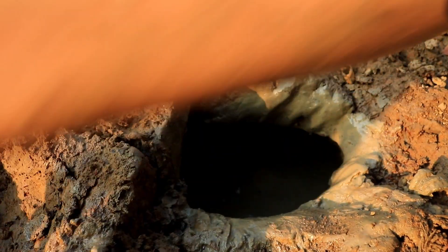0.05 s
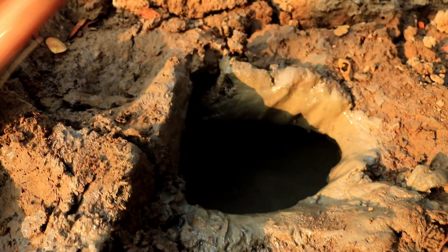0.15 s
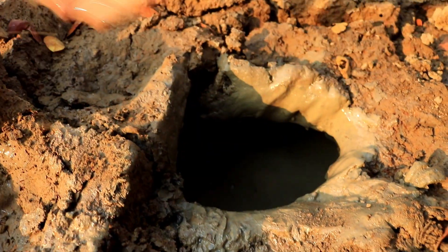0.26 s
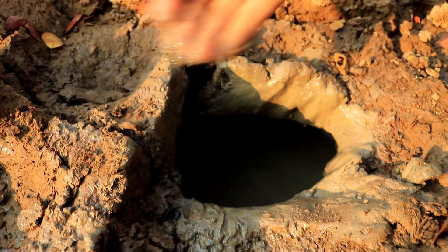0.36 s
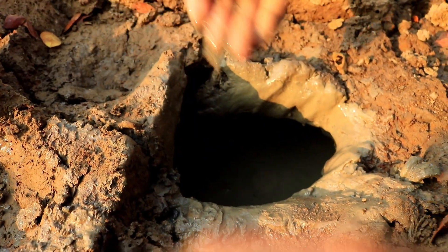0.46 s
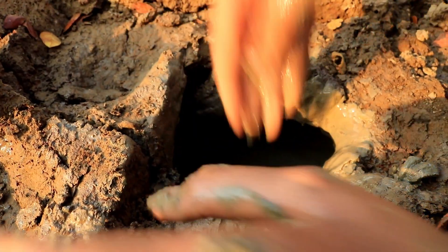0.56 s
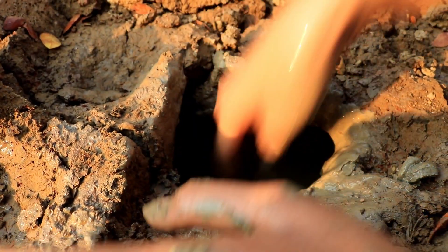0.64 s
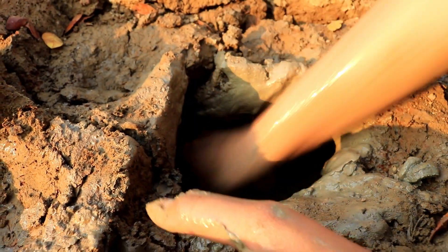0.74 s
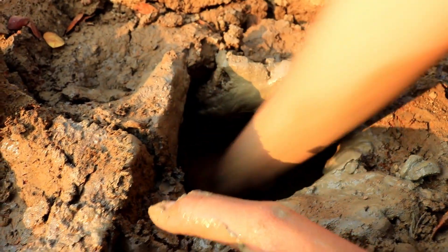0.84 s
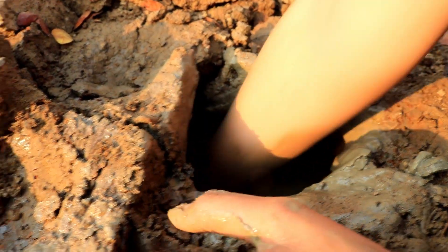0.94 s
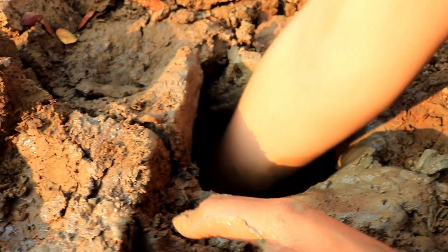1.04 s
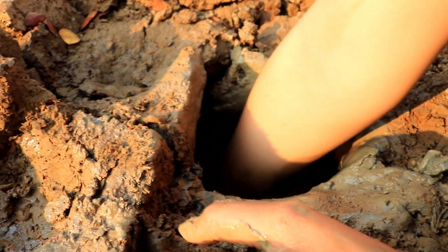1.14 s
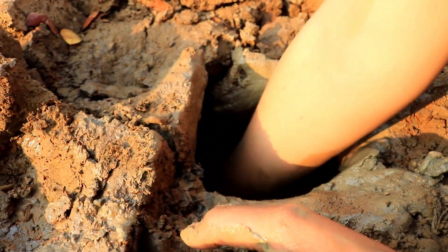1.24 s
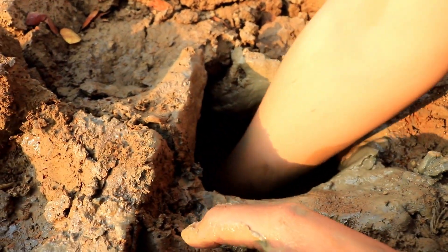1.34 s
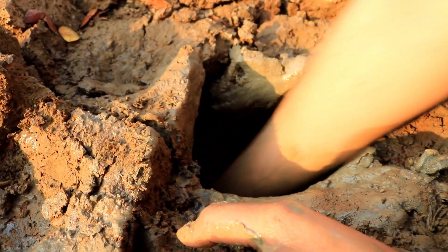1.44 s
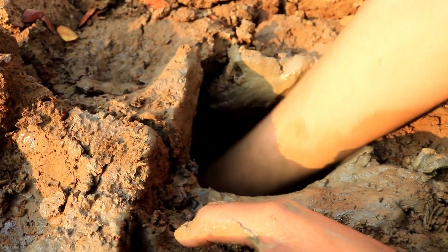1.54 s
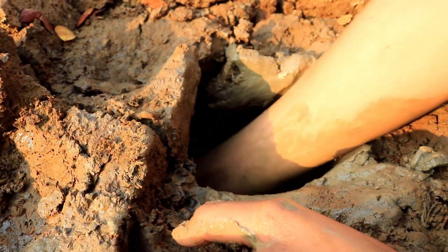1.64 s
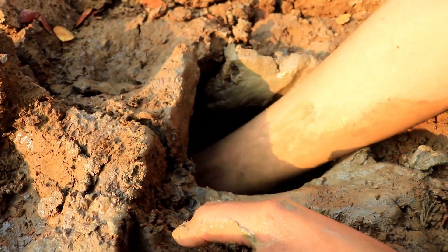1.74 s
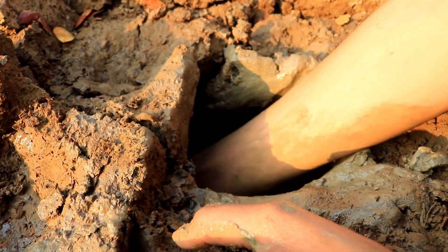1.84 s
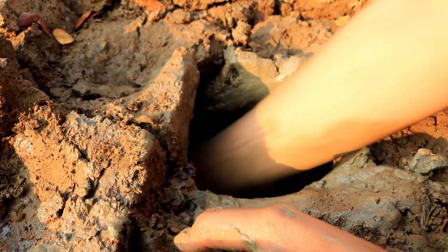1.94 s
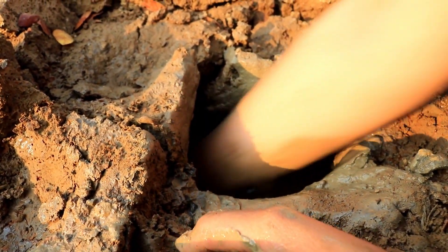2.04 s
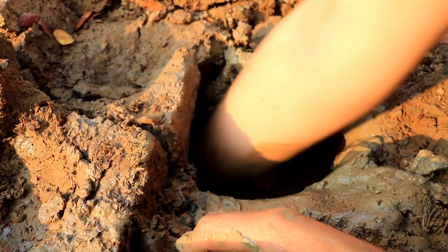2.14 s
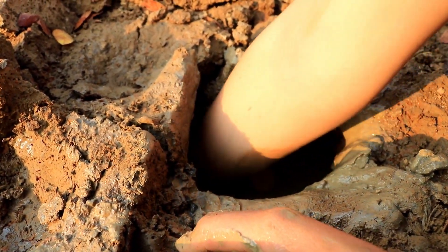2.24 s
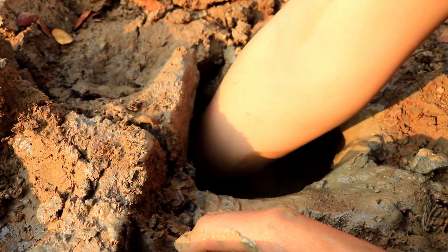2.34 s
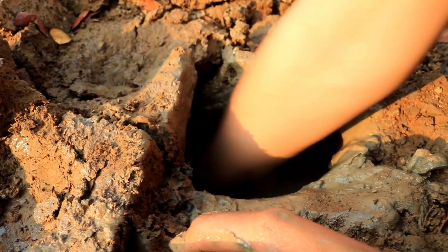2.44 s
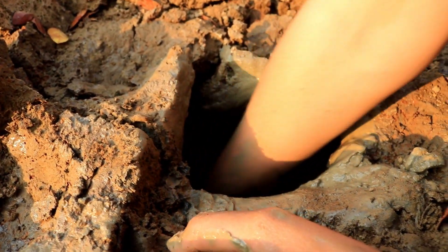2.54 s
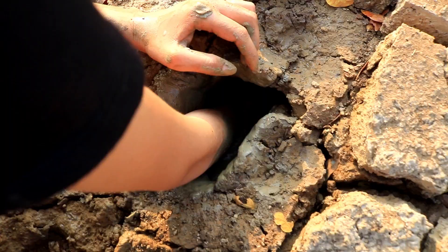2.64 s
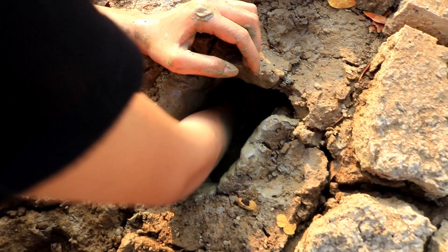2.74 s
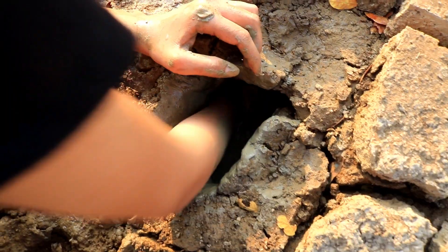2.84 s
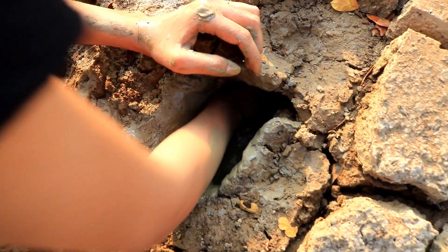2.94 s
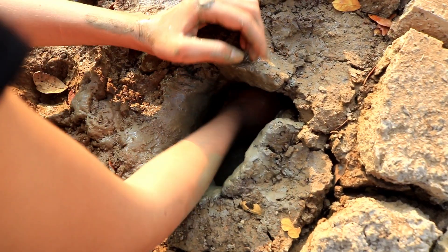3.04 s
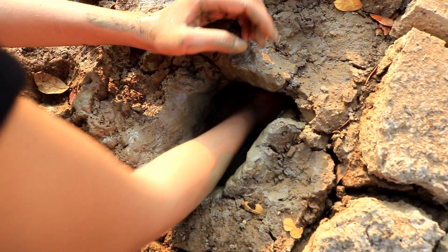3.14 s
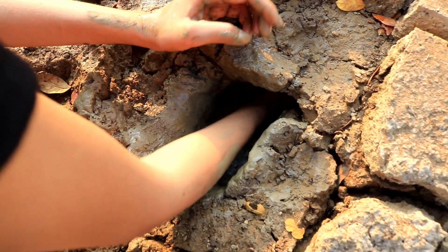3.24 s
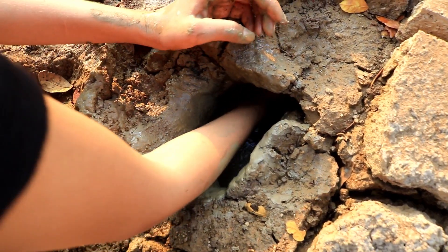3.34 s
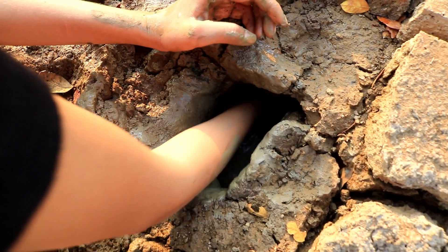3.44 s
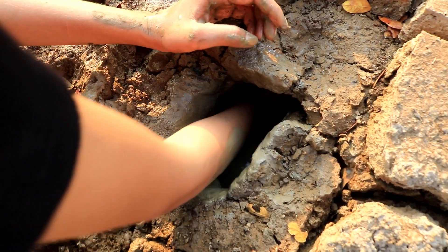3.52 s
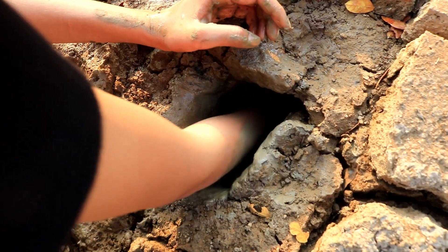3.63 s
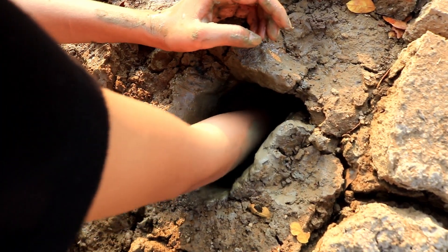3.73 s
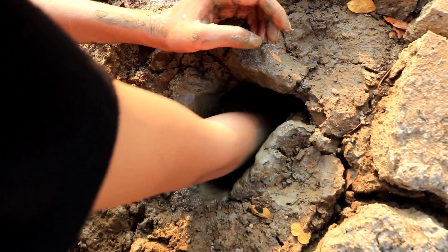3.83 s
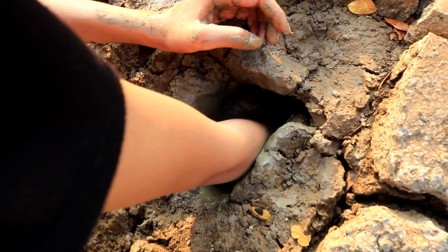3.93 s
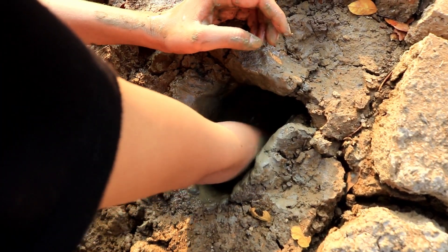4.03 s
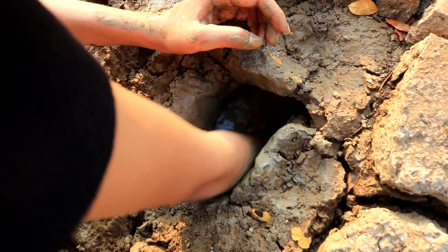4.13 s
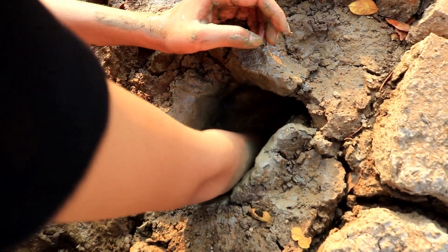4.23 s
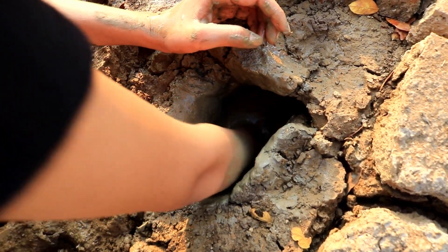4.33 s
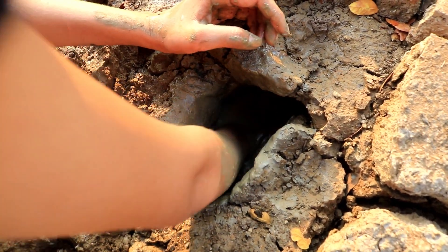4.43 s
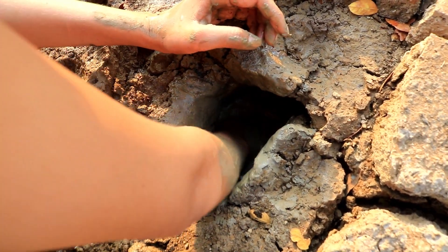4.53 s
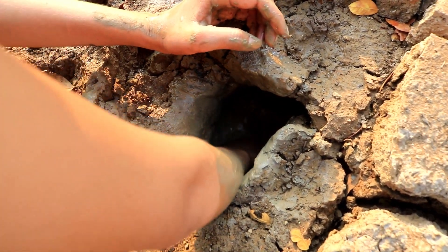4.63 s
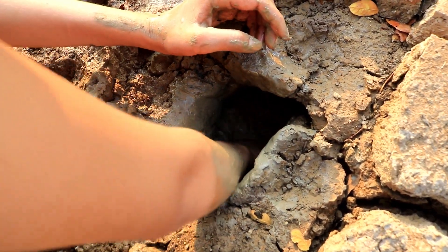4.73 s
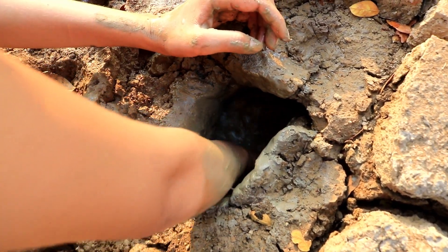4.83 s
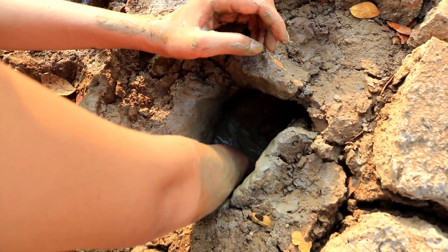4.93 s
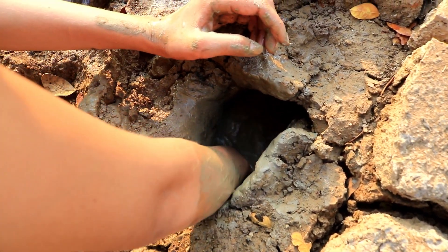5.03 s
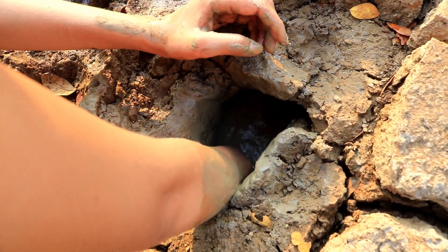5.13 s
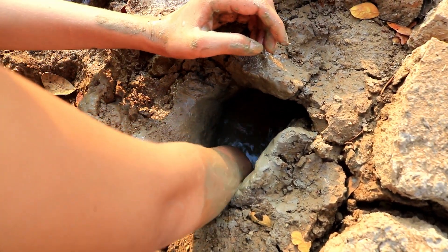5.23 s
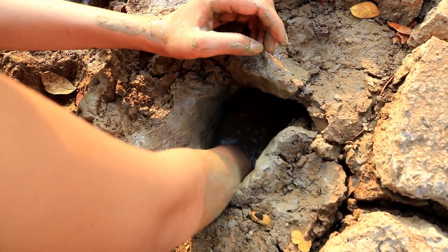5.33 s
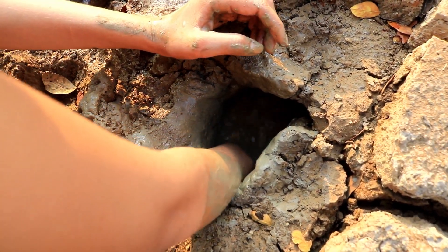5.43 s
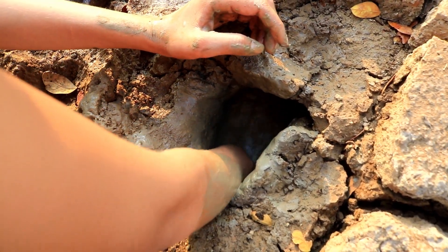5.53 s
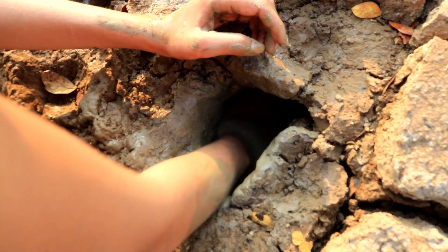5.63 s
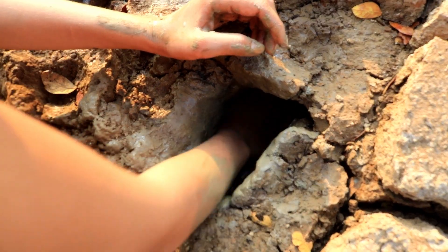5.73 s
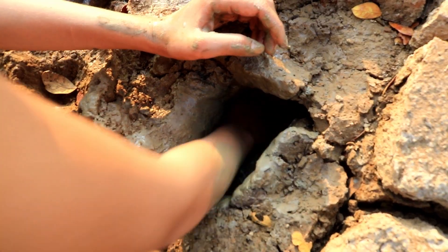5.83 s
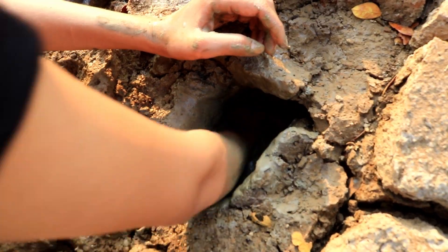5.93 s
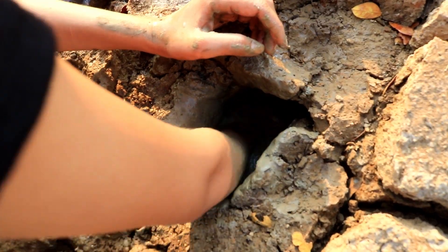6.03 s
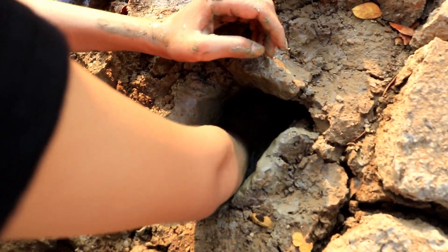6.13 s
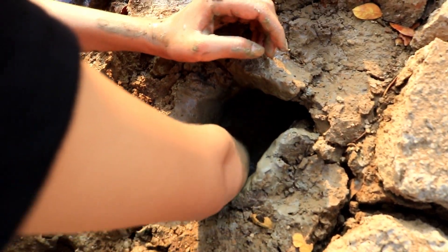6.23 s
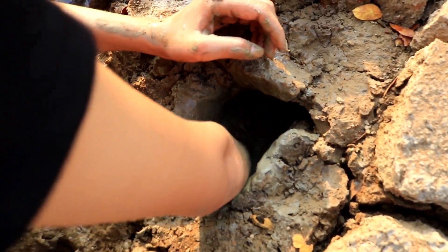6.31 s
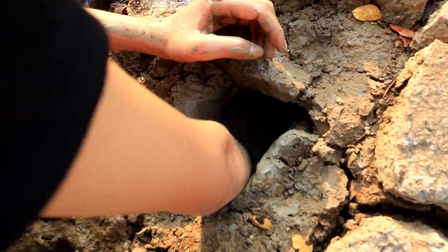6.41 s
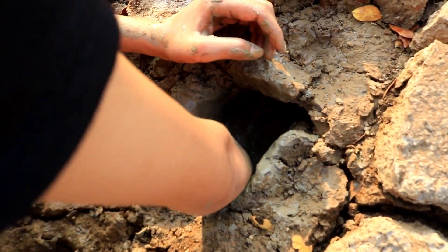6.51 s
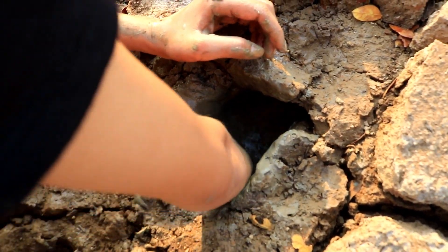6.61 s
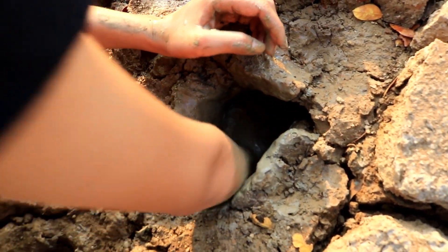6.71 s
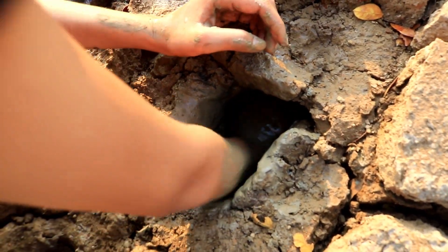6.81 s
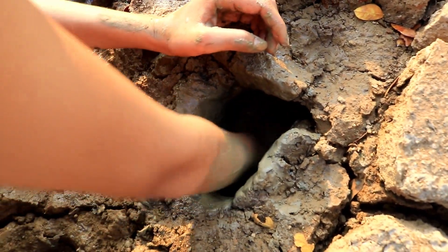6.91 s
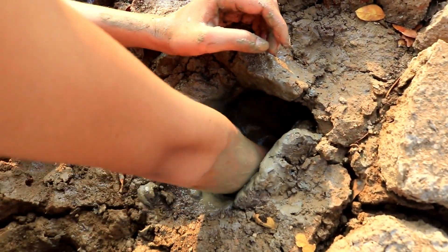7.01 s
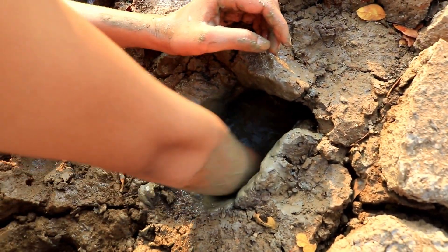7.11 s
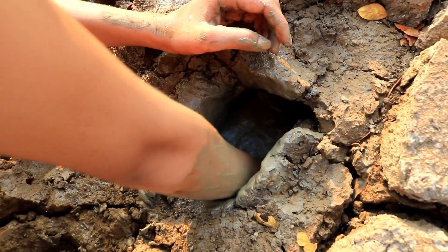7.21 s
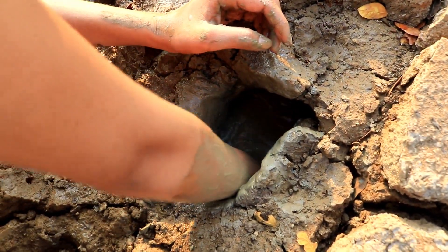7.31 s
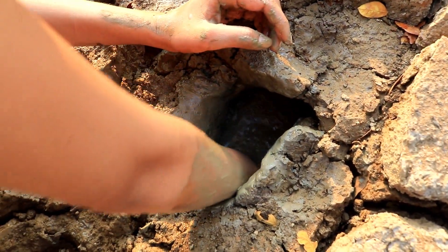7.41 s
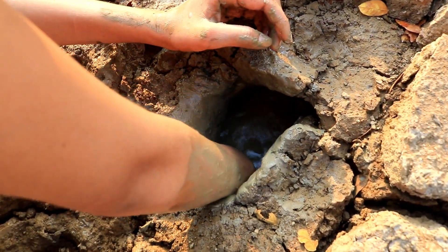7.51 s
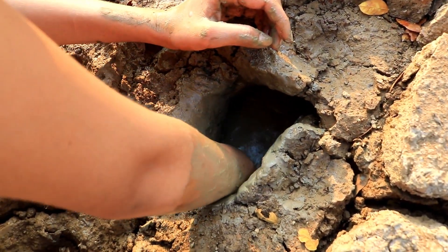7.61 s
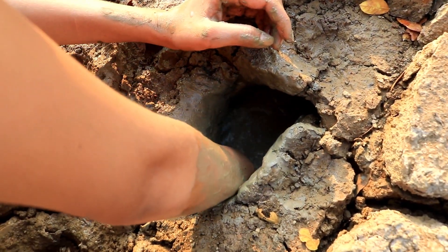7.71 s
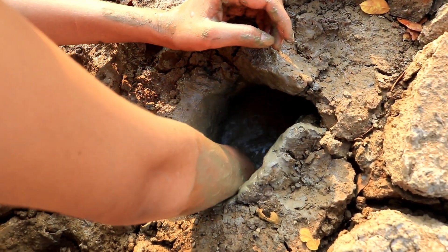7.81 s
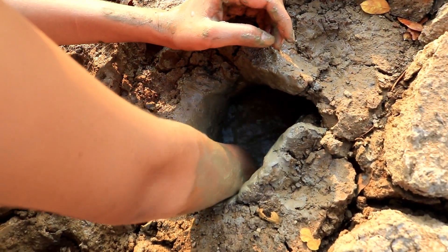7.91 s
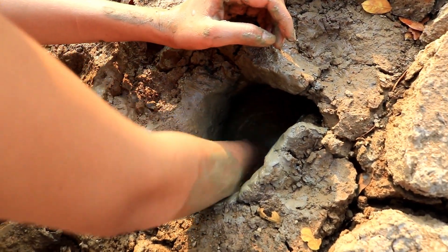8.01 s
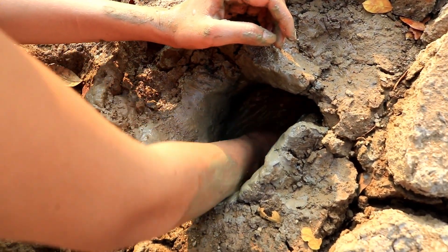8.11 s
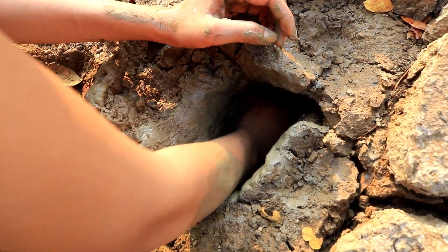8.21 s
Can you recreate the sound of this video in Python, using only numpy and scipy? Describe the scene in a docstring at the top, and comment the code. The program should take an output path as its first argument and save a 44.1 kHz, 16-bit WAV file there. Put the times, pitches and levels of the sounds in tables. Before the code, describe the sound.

Close irregular water slaps, gulping bubbles and fine spray from a hand stirring inside a muddy hole, low wind buffeting growing over the second half.

```python
"""A short fizz with a slap and plops opens over a faint open-air hush, then more slaps and plops
follow: an arm gropes in a narrow, water-filled hole in dry mud. Slaps are clusters of fading sine
tones with froth and spray of noise; plops are trapped bubbles, one fading sine each; droplets tick.
Gusts buffet both microphone ports: coloured noise shaken in lumps, with single thumps of pressure."""
import sys
import numpy as np
from scipy import signal
from scipy.fft import rfft, irfft, next_fast_len
from scipy.io import wavfile
from scipy.ndimage import uniform_filter1d, map_coordinates

SR = 44100
rng = np.random.default_rng(int(sys.argv[2]) if len(sys.argv) > 2 else 0)


def log_audio(samples):
    """Write samples as a 16-bit WAV file to the path given in sys.argv[1]."""
    # one column per channel
    frames = np.atleast_2d(samples).T
    # limit to full scale, then quantise
    limited = np.clip(frames, -1, 1)
    pcm = np.round(limited * 32767).astype(np.int16)
    wavfile.write(sys.argv[1], SR, pcm)


N = 364266  # length in samples
LEFT_RIGHT = np.array([[1], [-1]])  # splits a difference between the two ports


def amp(db):
    """Turn decibels into a gain."""
    return 10 ** (np.asarray(db) / 20)


def unit(x):
    """Scale to an average (rms) level of 1."""
    return x / np.sqrt(np.mean(x ** 2) + 1e-20)


def along(points, hz):
    """Read a curve of (Hz, value) points, with pitch on a log scale."""
    point_hz, value = np.transpose(points)
    return np.interp(np.log(hz + 1), np.log(point_hz + 1), value)


def curves(rows):
    """Give one value per sample for each column after the time."""
    s, *columns = np.transpose(rows)
    time = np.arange(N) / SR
    return [np.interp(time, s, column) for column in columns]


def wobble(rate):
    """A smooth random curve with this many random knots a second."""
    knots = rng.standard_normal(int(N * rate / SR) + 4)
    return map_coordinates(knots, [np.arange(N) * rate / SR])


def filtered(x, response):
    """Change the strength and phase of each frequency in x."""
    m = next_fast_len(N + 8192)
    return irfft(rfft(x, m) * response(np.fft.rfftfreq(m, 1 / SR)), m)[..., :N]


def rush(spectrum, alike, lumps):
    """Stereo noise of rms 1, shaken by the gain lumps before it is coloured."""
    # the angle sets how much the two sides share at each frequency
    angle = lambda hz: np.arccos(np.clip(along(alike, hz), -1, 1)) / 2
    shares = lambda hz: np.array([np.cos(angle(hz)), np.sin(angle(hz))])
    pair = lumps * rng.standard_normal((2, N))
    mid, side = filtered(pair, lambda hz: amp(along(spectrum, hz)) * shares(hz))
    return unit(np.array([mid + side, mid - side]))


def placed(s, wave, pan_db):
    """Add up rows of sound at their start times, each panned left or right."""
    start = np.round(s * SR).astype(int)
    at = (start[:, None] + np.arange(wave.shape[1])).ravel()
    panned = lambda side: (wave * amp(side * pan_db / 2)[:, None]).ravel()
    return np.array([np.bincount(at, panned(side), N + SR)[:N] for side in (1, -1)])


def bubbles(s, db, hz, t60, pan_db, rise, attack, rough):
    """Fading sines that start softly, climb a little in pitch and waver as the surface shakes."""
    t = np.arange(int(.1 * SR)) / SR  # each ring is cut off at 0.1 s
    fade = t / t60[:, None]  # t60: seconds to fall by 60 dB
    steps = uniform_filter1d(rng.standard_normal((len(s), len(t) // 22 + 1)), size=3, axis=1)
    steps = steps.repeat(22, axis=1)[:, :len(t)]
    shake = rough * uniform_filter1d(steps, size=22, axis=1)
    level = amp(db[:, None] - 60 * fade + 8 * shake) * (1 - np.exp(-t / attack))
    climb = 1 + rise * np.minimum(fade, 1)
    # the same shake, run backwards, disturbs the phase
    phase = 2 * np.pi * hz[:, None] * t * climb + shake[:, ::-1]
    return placed(s, level * np.sin(phase), pan_db)


def bursts(s, db, t60, pan_db, spectrum, attack):
    """Puffs of tiny drops: coloured noise with a quick start, ragged as it dies."""
    t = np.arange(int(.06 * SR)) / SR
    steps = rng.standard_normal((len(s), len(t) // 42 + 1))
    ragged = amp(5 * np.repeat(steps, 42, axis=1)[:, :len(t)])
    puff = amp(db[:, None] - 60 * t / t60[:, None]) * (1 - np.exp(-t / attack))
    puff = puff * rng.standard_normal((len(s), len(t))) * ragged
    colour = lambda hz: amp(along(spectrum, hz))
    colour_rms = np.sqrt(np.mean(colour(np.linspace(0, SR / 2, 999)) ** 2))
    return filtered(placed(s, puff, pan_db), colour) / colour_rms


def patchy(x, shared_db, own_db):
    """Random bright and dull patches in time and pitch, partly each port's own."""
    z = signal.stft(x, nperseg=256)[2]
    field = rng.standard_normal((3, *z.shape[1:]))
    field = uniform_filter1d(uniform_filter1d(field, size=6, axis=1), size=3, axis=2)
    patch_db = shared_db * unit(field[0]) + own_db * unit(field[1:])
    return signal.istft(z * amp(patch_db), nperseg=256)[1][:, :N]


def swells(s, db, rise_s, hold_s, fall_s):
    """Summed gain of swells that rise, hold and fall; rise_s and fall_s each span 20 dB."""
    t = np.arange(0, N / SR, .002)[:, None]
    before, after = (s - t) / rise_s, (t - s - hold_s) / fall_s
    down_db = 20 * np.maximum(0, np.maximum(before, after))
    gain = np.sqrt(np.sum(amp(db - down_db) ** 2, axis=1))
    return np.interp(np.arange(N) / SR, t[:, 0], gain)


# How the water's strength differs between the ports: pitch_hz, left_minus_right_db
PORT_COLOUR = [(500, 1.5), (1170, 2), (1790, -7), (2740, 5), (4190, 4.5), (6000, -8), (8000, 0),
               (15000, -6.5)]


def ports(x):
    """Sound from the hole falls unevenly on the two ports, differently at each pitch."""
    return filtered(x, lambda hz: amp(along(PORT_COLOUR, hz) / 2 * LEFT_RIGHT))


# Ringing tones of the air column in the hole: pitch_hz, width_hz, level_db
HOLE_TONES = [(795, 19, 2), (1350, 52, 0), (1833, 21, -7), (2370, 110, -2), (2716, 490, -9),
              (3570, 350, 0.5)]


def hole(x):
    """The air column in the hole rings at its own tones, which alternate in sign."""
    def ringing(f):
        total = 0
        for k, (centre, width, db) in enumerate(HOLE_TONES):
            tone = 1j * f * width / (centre * centre - f * f + 1j * f * width)
            total = total + (-1) ** k * amp(db) * tone
        return total
    return filtered(x, ringing)


# How hard the arm stirs, as a guide that each part of the fizz scales: time_s, strength_db
ARM_STIRRING = [(0, -33), (.15, -51), (.23, -38.5), (.3, -45), (.9, -46.5), (1.17, -39.5), (1.45, -46),
                (2.0, -47), (2.9, -43.5), (3.4, -38), (3.7, -43.5), (4.0, -47.5), (4.13, -40.5),
                (4.3, -47.5), (4.9, -48), (5.55, -42.5), (5.75, -46.5), (6.45, -43.5), (6.62, -37),
                (6.85, -43.5), (7.05, -31), (7.25, -40), (7.8, -45.5), (8.26, -48.5)]
SWELL_DB, SWELL_GROWS = -22.5, 0.88  # fizz swelling around a slap: offset in dB, dB per dB of slap
SWELL_RISE_S, SWELL_FALL_S = 0.029, 0.1  # time to come from and return to 20 dB down


def stirring_db():
    """Fizz follows the stirring arm and swells around each slap, rising just before, fading after."""
    s, db = np.transpose(SLAP_EVENTS)[:2]
    around_slaps = swells(s, SWELL_DB + SWELL_GROWS * db, SWELL_RISE_S, 0, SWELL_FALL_S)
    return 20 * np.log10(np.hypot(amp(curves(ARM_STIRRING)[0]), around_slaps))


def small_bubbles(moment):
    """2500 small bubbles ring briefly; most are faint and a few are loud."""
    when, size, pitch, life, side = rng.random((2500, 5)).T
    hz = 2250 * np.exp(1.8 * (pitch - .5))
    size_db = -3.5 * np.log(size + 0.01)
    t60, pan_db = (35 + 90 * life) / hz, 10 * (side - .5)
    return unit(bubbles(moment(when), size_db, hz, t60, pan_db, rise=0.05, attack=0.0006, rough=0.6))


# Colour of the froth noise: pitch_hz, level_db_per_hz
FROTH_COLOUR = [(530, -12), (900, -4.5), (995, -53), (1170, -47), (1420, -14), (2140, 7.5), (3070, 8.5),
                (5000, 0.5), (6500, -20), (11000, -120)]


def froth_noise(churn):
    """Bubbles too many to tell apart: lumpy noise that also rings the hole."""
    froth = rush(FROTH_COLOUR, [(2000, 0.35)], amp(5 * churn + 3 * wobble(250)))
    return unit(froth + amp(11) * hole(froth))


# Colour of the noise of fine spray: pitch_hz, level_db_per_hz
SPRAY_COLOUR = [(2350, -11), (4000, 2), (5600, 2.5), (6080, 1), (7940, -1.5), (8570, -6), (13900, -16),
                (16400, -25)]


def droplets(moment):
    """500 droplets, each a tiny high ring together with a puff of spray."""
    when, size, pitch, life, side = rng.random((500, 5)).T
    s, size_db, pan_db = moment(when), -4 * np.log(size + 0.0057), 14 * (side - .5)
    hz, t60 = 6800 * np.exp(1.1 * (pitch - .5)), .008 + 0.037 * life
    pings = bubbles(s, size_db, hz, t60, pan_db, rise=0.029, attack=0.0003, rough=1.14)
    puffs = bursts(s, size_db, 0.0042 + 0.037 * life, pan_db, SPRAY_COLOUR, attack=0.00063)
    return unit(pings) + amp(1.5) * unit(puffs)


def mist_noise(churn):
    """Fine spray as one patchy noise that churns along with the froth."""
    lumps = amp(9.3 * churn + 1.3 * wobble(200))
    mist = rush(SPRAY_COLOUR, [(6000, 0.079)], lumps)
    return patchy(mist, shared_db=2.5, own_db=0.5)


def fizz():
    """Small bubbles and droplets come thicker and louder as stirring grows, over froth and mist."""
    stir_db = stirring_db()
    # more stirring takes a larger share of the random moments
    share = np.cumsum(amp(.9 * stir_db + 4 * wobble(30)))
    moment = lambda u: np.interp(u * share[-1], share, np.arange(N) / SR)
    churn = wobble(60)
    out = amp(1.191 * stir_db + 2.5) * small_bubbles(moment)
    out += amp(1.012 * stir_db - 14.5) * droplets(moment)
    out += amp(1.347 * stir_db + 4.5) * froth_noise(churn)
    out += amp(1.341 * stir_db + 2.5) * mist_noise(churn)
    return ports(out)


# Colour of the open-air hush: pitch_hz, level_db_per_hz
HUSH_COLOUR = [(15, -46), (25, -23), (97, -5), (280, 2.5), (523, -0.5), (1000, -6), (1980, -9.5),
               (2970, -8), (4970, -15.5), (8560, -15), (14000, -25.5), (15100, -23), (16400, -37)]
# How alike the hush is on both sides: pitch_hz, likeness (1 = the same)
HUSH_LIKENESS = [(60, 0.16), (400, 0.63), (2400, 0.025), (15000, .01)]
HUSH_DB = -50.5  # rms level


def hush():
    """Quiet open air: soft coloured noise whose level drifts slowly."""
    drift = amp(.8 * wobble(6))
    return amp(HUSH_DB) * rush(HUSH_COLOUR, HUSH_LIKENESS, drift)


# Gusts on the ports: arrival_s, level_db, hold_s, sharpness_db (small eddies above the buffet)
GUST_EVENTS = [(0.0, -45.5, 0.044, 5.5), (0.385, -37.5, 0.024, -21.5), (1.466, -30.5, 0.04, -31),
               (1.697, -42.5, 0.071, -22), (1.826, -34, 0.05, -24), (2.116, -44, 0.015, 15),
               (2.314, -40, 0.093, -30), (2.555, -27, 0.064, -9), (2.677, -25.5, 0.09, -16),
               (2.788, -41, 0.049, -26), (3.014, -22.5, 0.15, 0.5), (3.226, -20.5, 0.083, -8),
               (3.503, -15.5, 0.048, -0.5), (3.622, -23, 0.08, -9), (3.773, -22, 0.069, -9),
               (3.963, -19.5, 0.13, 0.5), (4.245, -23.5, 0.097, -6), (4.365, -21.5, 0.13, -3),
               (4.574, -19, 0.025, -0.5), (4.672, -18.5, 0.016, -4.5), (4.751, -23, 0.035, -16),
               (4.829, -27, 0.015, -9.5), (4.973, -33, 0.031, -12), (5.309, -16.5, 0.058, -9),
               (5.498, -25, 0.17, -11.5), (6.049, -16.5, 0.097, -0.5), (6.316, -19.5, 0.24, 7),
               (6.667, -27, 0.21, 4.5), (6.95, -23.5, 0.2, 2), (7.208, -25, 0.14, 0),
               (7.374, -19.5, 0.087, -2), (7.506, -23.5, 0.05, -7), (7.602, -18.5, 0.15, -4),
               (7.816, -23.5, 0.11, 1), (8.173, -26.5, 0.0087, -17)]
# Breeze between the gusts: time_s, level_db
BREEZE_LEVEL = [(0, -49), (.35, -51.5), (.5, -64.5), (1.3, -49.5), (2.0, -56), (2.5, -45), (2.95, -50),
                (3.35, -30.5), (3.92, -53), (4.15, -25.5), (4.54, -32), (5.15, -30), (5.27, -41.5),
                (5.7, -32), (6.0, -42), (6.2, -31), (6.6, -21.5), (6.9, -30), (7.1, -34), (7.5, -58),
                (7.8, -17.5), (8.12, -36.5), (8.26, -58)]
# Colour of the low buffeting: pitch_hz, level_db_per_hz
BUFFET_COLOUR = [(12, -38), (20, -75), (48, -27), (123, 5.5), (275, -6), (362, -19.5), (400, -18),
                 (520, -36), (880, -120)]
# Colour of the small, sharp eddies: pitch_hz, level_db_per_hz
SHARP_COLOUR = [(120, -8), (250, 4.5), (500, -8.5), (900, -23), (1600, -49), (4000, -120)]
# How alike the wind is on both sides: pitch_hz, likeness (1 = the same)
WIND_LIKENESS = [(25, 0.46), (60, 0.69), (150, 0.67), (380, 0.59), (950, 0.99)]
BREEZE_SHARP_DB = -13  # small eddies relative to the breeze
GUST_RISE_S, GUST_FALL_S = 0.026, 0.05  # time to come from and return to 20 dB down


def wind():
    """Eddies shake the ports in lumps and flutter; in stronger wind deep bass grows more slowly."""
    s, db, hold_s, sharp_db = np.transpose(GUST_EVENTS)
    breeze = amp(curves(BREEZE_LEVEL)[0])
    buffet = np.hypot(breeze, swells(s, db, GUST_RISE_S, hold_s, GUST_FALL_S))
    sharp_gusts = swells(s, db + sharp_db, GUST_RISE_S, hold_s, GUST_FALL_S)
    edge = np.hypot(amp(BREEZE_SHARP_DB) * breeze, sharp_gusts)

    lump = wobble(35)  # shared, so the small eddies ride on the strongest lumps
    low = rush(BUFFET_COLOUR, WIND_LIKENESS, amp(2.0 * lump + 3.55 * wobble(120)))
    sharp = rush(SHARP_COLOUR, WIND_LIKENESS, amp(3.18 * lump + 6.33 * wobble(150)))
    deep_colour = [(15, -44), (50, 1.5), (90, 5.5), (400, -120)]  # pitch_hz, level_db_per_hz
    deep = rush(deep_colour, WIND_LIKENESS, amp(1.7 * lump))

    flutter_hz = 135 * np.exp(.3 * wobble(55) + .3 * wobble(140))  # wandering speed
    turn = 2 * np.pi * np.cumsum(flutter_hz) / SR
    flutter = amp(4 * lump + 3 * wobble(70)) * np.cos(turn)
    low = unit(low + amp(-1) * unit(flutter))

    gusts = buffet * low + edge * sharp + amp(-17.5) * buffet ** 0.64 * deep
    top = .55  # the membranes give less to the strongest swings
    return top * np.tanh(gusts / top) * amp(-.7 * LEFT_RIGHT)  # a little stronger on the right


# Slaps of water: start_s, level_db, pitch_hz, spray_db (relative to the slap)
SLAP_EVENTS = [(0.014, -23.5, 3440, -5), (0.896, -22.5, 2050, -15), (0.9153, -19.5, 3270, -3),
               (0.986, -23, 2320, -17), (1.071, -25, 3750, -16), (1.156, -17, 2480, -25),
               (1.175, -24, 3970, -18), (1.192, -26, 1370, -12), (1.317, -14.5, 3100, -8),
               (1.7747, -32.5, 4700, -9.5), (1.814, -25.5, 2710, -20.5), (2.085, -23, 3550, -13),
               (2.107, -17, 1450, -5.5), (2.1313, -9, 2910, -28), (2.1975, -25.5, 2820, -16),
               (2.288, -23.5, 1710, -26), (2.422, -33, 3100, -7), (2.608, -24.5, 1330, -34),
               (2.6287, -19, 1410, -17), (2.667, -29, 3120, -12.5), (2.7658, -29, 2900, -11),
               (2.836, -12.5, 2610, -38), (2.8988, -20.5, 1420, -16), (3.01, -31.5, 3020, -32),
               (3.069, -17.5, 3620, -8.5), (3.162, -29.5, 1800, -9), (3.2108, -15, 2700, -15),
               (3.25, -22, 3250, -12.5), (3.3045, -25.5, 3550, -6), (3.333, -22.5, 1360, -16),
               (3.356, -14, 2860, -40), (3.403, -24.5, 1450, -18), (3.4119, -23, 2830, -4.5),
               (3.494, -18, 2560, -7.5), (3.514, -9.5, 3470, -21), (3.5721, -10.5, 1210, -15.5),
               (3.839, -30.5, 3350, -7.5), (4.064, -35.5, 3620, -4), (4.1102, -26, 2220, -6),
               (4.2154, -31.5, 2930, -39), (4.5145, -26.5, 4000, -5.5), (4.9562, -15, 1980, -10),
               (5.205, -25, 2580, -10), (5.24, -22.5, 3510, -21), (5.268, -25.5, 2860, -21),
               (5.3175, -19, 2360, -1.5), (5.474, -18.5, 1840, -21), (5.5396, -28, 3250, -23),
               (5.5672, -26.5, 2980, -16.5), (5.581, -30, 2030, -9), (5.602, -33.5, 2720, -21),
               (5.652, -23, 3600, -17), (5.769, -21, 2100, -20), (5.8341, -11.5, 3590, -8.5),
               (5.918, -29.5, 2960, -15), (5.94, -28.5, 2480, -17), (6.026, -30, 3550, -8.5),
               (6.08, -26, 1350, -21), (6.2649, -28.5, 2340, -19), (6.298, -31, 2980, -22),
               (6.324, -11, 2660, -17), (6.3669, -19.5, 2340, -33), (6.4465, -37.5, 3020, 1),
               (6.4963, -29, 1270, -40), (6.5999, -26.5, 3220, -22), (6.636, -23.5, 2520, -15),
               (6.705, -33, 1820, -5), (6.768, -28.5, 2790, -9), (6.917, -28.5, 2920, -18),
               (6.9397, -24.5, 2900, -30), (7.0035, -12.5, 3670, -11.5), (7.0357, -16.5, 2390, -4.5),
               (7.1076, -11.5, 2890, -14.5), (7.2763, -30, 2850, -32), (7.29, -26, 1910, -19),
               (7.305, -19.5, 3010, -10), (7.3255, -6, 2940, -22.5), (7.423, -31, 1810, -31),
               (7.7888, -27, 2290, -26), (8.0452, -25.5, 3230, -22), (8.1876, -20, 2390, -13),
               (8.2316, -15.5, 2430, -14)]


def slaps():
    """Each slap traps a cluster of short-lived bubbles, rings the hole and throws froth and spray."""
    s, db, hz, spray_db = np.transpose(SLAP_EVENTS)
    t60, centre = .04 + 0 * s, 0 * s
    out = bubbles(s, db, hz, 0.44 * t60, centre, rise=0.0039, attack=0.00046, rough=0.97)
    # four softer-starting bubbles follow each slap, weaker the later they come
    for chance in rng.standard_normal((len(s), 4, 4)).transpose(1, 2, 0):
        late = 0.22 * t60 * np.abs(chance[0])
        level_db = db - 0.5 + 3 * chance[1] - 30 * late / t60
        hz_near = hz * np.exp(0.246 * chance[2])
        out += bubbles(s + late, level_db, hz_near, .5 * t60, 3 * chance[3],
                       rise=0.084, attack=0.0052, rough=0.37)
    froth = bursts(s, db - 11.0, t60, centre, FROTH_COLOUR, attack=0.00094)
    out += froth + amp(10.5) * hole(froth)
    spray_pan_db = 4 * rng.standard_normal(len(s))
    spray = bursts(s, db + spray_db - 0.8, 1.12 * t60, spray_pan_db, SPRAY_COLOUR, attack=0.00057)
    out += patchy(spray, shared_db=4.5, own_db=3.5)
    return ports(out)


# Bubbles that ring out clearly: start_s, level_db, pitch_hz, ring_s (time to fall 60 dB)
PLOP_EVENTS = [(.015, -16.5, 680, 0.013), (0.138, -7.5, 750, 0.0062), (0.206, -28.5, 2300, 0.028),
               (0.893, -32, 1860, 0.12), (.92, -34, 845, 0.053), (0.9235, -6.5, 2540, 0.014),
               (.988, -30, 847, 0.049), (.997, -28, 2860, 0.041), (1.032, -23, 2280, 0.027),
               (1.058, -30, 2790, 0.019), (1.074, -16, 3540, 0.022), (1.122, -21, 1010, 0.027),
               (1.124, -33, 1420, 0.13), (1.14, -29, 2360, 0.058), (1.155, -28, 1860, 0.039),
               (1.154, -25, 1400, 0.11), (1.19, -14.5, 1113, 0.035), (1.202, -11.5, 1402, 0.066),
               (1.315, -11, 2900, 0.054), (1.316, -1.5, 2145, 0.014), (1.813, -24, 2870, 0.028),
               (2.075, -34, 832, 0.5), (2.106, -14, 1557, 0.051), (2.1274, -17.5, 850, 0.093),
               (2.129, -14.5, 2300, 0.037), (2.128, -15, 3660, 0.038), (2.138, -28, 1364, 0.23),
               (2.1745, -15, 2971, 0.017), (2.199, -28, 820, 0.1), (2.291, -23, 1445, 0.042),
               (2.333, -27.5, 1960, 0.055), (2.424, -13, 2860, 0.017), (2.6118, -18, 1380, 0.034),
               (2.632, -16.5, 1400, 0.059), (2.9034, -19.5, 3050, 0.048), (2.908, -25.5, 1434, 0.071),
               (3.048, -17.5, 1500, 0.017), (3.072, -17, 4070, 0.036), (3.09, -26, 3280, 0.049),
               (3.104, -24, 3250, 0.023), (3.127, -28, 2860, 0.027), (3.164, -20.5, 1770, 0.04),
               (3.2084, -12.5, 984, 0.046), (3.2426, -30, 2226, 0.15), (3.262, -22, 3300, 0.023),
               (3.329, -32, 1230, 0.14), (3.344, -24, 1800, .064), (3.356, -2, 2960, 0.015),
               (3.3863, -23, 3430, 0.021), (3.421, -22, 3780, 0.035), (3.41, -31, 1270, 0.23),
               (3.506, -16, 3620, 0.034), (3.529, -23, 1190, 0.025), (3.555, -25, 1280, 0.025),
               (3.571, -26, 2400, 0.16), (3.5729, -14.5, 3670, 0.042), (3.5745, -14, 785, 0.13),
               (3.583, -10.5, 1405, 0.05), (3.633, -20, 3560, 0.032), (3.642, -20.5, 1220, 0.039),
               (4.133, -25, 3300, 0.047), (4.557, -30.5, 3040, 0.047), (4.953, -21, 970, 0.047),
               (5.006, -28.5, 810, 0.17), (5.0167, -28.5, 3040, 0.035), (5.206, -21, 890, 0.023),
               (5.206, -27, 1740, 0.033), (5.2197, -20, 2433, 0.021), (5.3927, -29.5, 1440, 0.078),
               (5.414, -23.5, 2230, 0.047), (5.4725, -16, 3110, 0.024), (5.473, -11, 1830, 0.064),
               (5.5075, -22.5, 3150, 0.039), (5.575, -30, 767, 0.096), (5.607, -28, 2770, 0.023),
               (5.624, -32, 946, .04), (5.651, -24.5, 1000, .04), (5.7668, -12, 1903, 0.034),
               (5.78, -32, 1076, 0.11), (5.792, -20.5, 1790, 0.046), (5.82, -18, 2940, 0.054),
               (5.827, -4, 1016, 0.034), (5.896, -35, 1355, .07), (5.9555, -29, 1740, 0.07),
               (6.012, -33.5, 1280, 0.062), (6.085, -19.5, 895, 0.032), (6.108, -31, 1336, .05),
               (6.13, -23.5, 966, 0.024), (6.14, -30, 1320, 0.039), (6.265, -27, 904, 0.043),
               (6.326, -30.5, 2690, 0.16), (6.337, -30, 990, 0.033), (6.409, -24, 3820, 0.036),
               (6.496, -10.5, 1220, 0.06), (6.5397, -21.5, 2045, 0.09), (6.547, -23, 3450, 0.035),
               (6.559, -24, 1390, 0.06), (6.5591, -17.5, 757, 0.067), (6.5601, -17, 2130, 0.024),
               (6.601, -34, 3280, 0.067), (6.622, -21, 870, 0.055), (6.64, -26, 1307, 0.11),
               (6.65, -19, 3030, 0.037), (6.69, -32, 3000, .04), (6.769, -25.5, 2830, 0.023),
               (6.919, -26.5, 887, 0.11), (6.941, -11, 2900, 0.024), (6.962, -19, 1900, 0.044),
               (6.983, -19, 3380, 0.021), (7.003, -19.5, 2040, 0.051), (7.03, -17, 1460, 0.064),
               (7.0655, -19, 3080, 0.059), (7.1015, -12, 3740, 0.019), (7.102, -31, 1280, 0.09),
               (7.14, -36, 1820, 0.083), (7.132, -21, 3120, 0.062), (7.203, -30, 2350, 0.078),
               (7.289, -22, 2910, 0.091), (7.3441, -8, 920, 0.035), (7.35, -12, 2800, 0.025),
               (7.356, -16.5, 1278, 0.079), (7.445, -25, 3370, 0.027), (7.512, -24.5, 970, 0.041),
               (7.52, -25, 1540, 0.036), (7.555, -33, 1000, 0.055), (8.1837, -27.5, 3110, 0.14),
               (8.2023, -24, 1830, 0.1)]


def plops():
    """A trapped bubble starts softly, rings and climbs a little in pitch."""
    s, db, hz, t60 = np.transpose(PLOP_EVENTS)
    return ports(bubbles(s, db, hz, t60, 0 * s, rise=0.028, attack=0.0011, rough=.55))


# Droplet ticks: start_s, level_db, pitch_hz, left_minus_right_db
TICK_EVENTS = [(0.1367, -5.5, 7400, 1), (0.232, -25, 9300, -13), (0.685, -22, 8200, 4),
               (0.9152, -3.5, 5160, -8), (1.315, -23, 5040, -8), (2.709, -11.5, 6750, -4),
               (2.851, -9.5, 4680, -7), (3.07, -27, 6700, -12), (3.211, -17, 5500, -9),
               (3.574, -28, 4800, 9), (4.024, -27.5, 6800, -3), (4.954, -38, 4000, -23),
               (5.3194, -15.5, 5720, -5.5), (5.835, -14, 5740, -4), (6.153, -21.5, 10040, -1),
               (6.341, -17.5, 6770, -5), (7.316, -26, 8300, 0), (7.33, -17.5, 7600, -2),
               (7.804, -23.5, 6300, -5), (8.212, -26, 6300, -8)]


def ticks():
    """A droplet bursts: a tiny bubble rings in a crack of spray."""
    s, db, hz, pan_db = np.transpose(TICK_EVENTS)
    ring = bubbles(s, db + 1.0, hz, 0.013 + 0 * s, pan_db, rise=0.021, attack=0.0001, rough=1.0)
    crack = bursts(s, db - 9.0, 0.028 + 0 * s, pan_db, SPRAY_COLOUR, attack=0.0014)
    return ring + crack


# Single eddies that thump the ports: time_s, level_db (of the swing without its crest)
THUMP_EVENTS = [(2.684, -11), (3.034, -11), (3.521, -8.5), (3.66, -15), (4.024, -4), (4.39, -14),
                (4.468, -7.5), (4.695, -16.5), (5.307, -10.5), (6.152, -11.5), (6.829, -8.5), (6.85, -8),
                (6.978, -5.5), (7.145, -9.5), (7.44, -9)]


def thumps():
    """One swing of pressure, in and out, with a sharp crest and a new width each time."""
    s, db = np.transpose(THUMP_EVENTS)
    width_s = 0.00073 * np.exp(0.29 * rng.standard_normal((len(s), 1)))
    u = (np.arange(int(.02 * SR)) / SR - .004) / width_s  # the crest comes 4 ms after the start
    swing = (1 - u * u) * np.exp(-u * u / 2)
    crest = 0.18 * np.exp(-(3 * u) ** 2)
    return placed(s, -amp(db[:, None]) * (swing + crest), 0 * s)


def lagged(x, seconds):
    """The left port hears x later than the right."""
    return filtered(x, lambda hz: np.exp(-1j * np.pi * hz * seconds * LEFT_RIGHT))


# Side from which the water sounds as the arm moves: time_s, left_minus_right_db
WATER_SIDE = [(0.0, 4.5), (0.23, 4), (0.71, 4), (0.8, -1), (2.51, -1), (3.31, 2.5), (4.42, 0.5), (7.82, 1),
              (8.26, 1.5)]
# Phase by which the water leads on the left: pitch_hz, lead_radians
LEFT_LEAD = [(0, 0), (1200, -1.0), (2300, -.1), (5100, -2.6), (8000, -.8), (11000, -2)]


def scene():
    """Water reaches the two ports at different phases; wind and hush lie around it."""
    pan_db, = curves(WATER_SIDE)
    water = (fizz() + slaps() + plops()) * amp([pan_db / 2, -pan_db / 2]) + ticks()
    lead = lambda hz: np.interp(hz, *np.transpose(LEFT_LEAD))
    water = filtered(water, lambda hz: np.exp(.5j * lead(hz) * LEFT_RIGHT))
    return water + lagged(wind() + thumps(), 0.00034) + hush()


TOP_HZ = 16575  # nothing is heard above this
DIP_S, DIP_WIDTH_S = 2.66, 0.0095  # middle of the dip, and its half-width


def record(dry):
    """The tallest peaks are rounded off, the level dips briefly once and the top treble is cut."""
    rounded = dry / (1 + np.abs(dry / .95) ** 6) ** (1 / 6)
    dip = 1 - .9 * np.exp(-((np.arange(N) / SR - DIP_S) / DIP_WIDTH_S) ** 4)
    return filtered(dip * rounded, lambda hz: hz < TOP_HZ)


dry = scene()
out = record(dry)
log_audio(out)
```